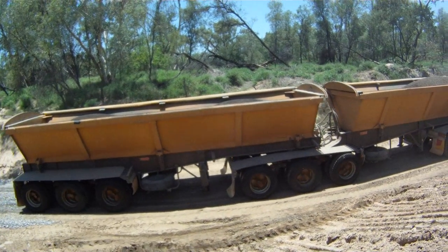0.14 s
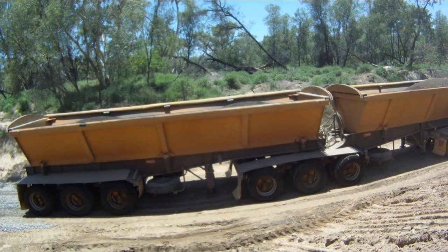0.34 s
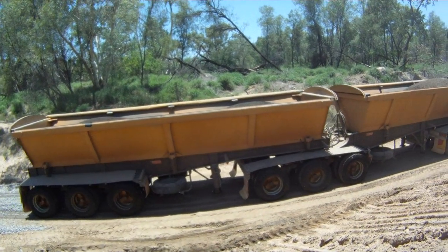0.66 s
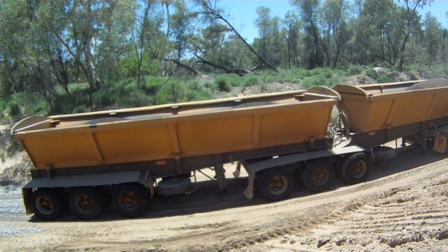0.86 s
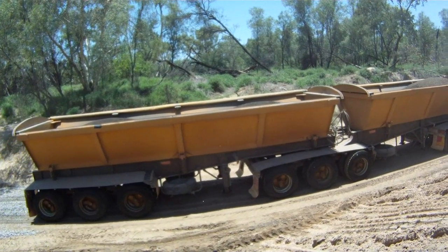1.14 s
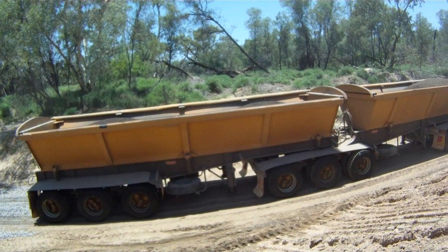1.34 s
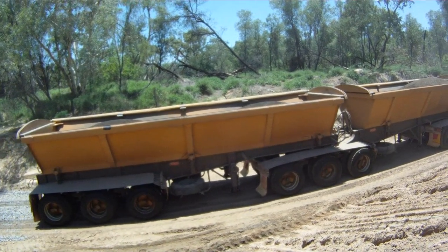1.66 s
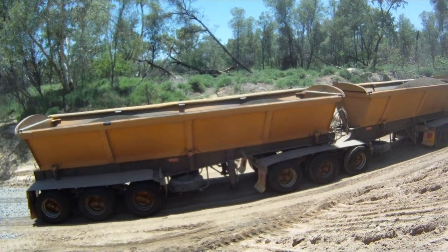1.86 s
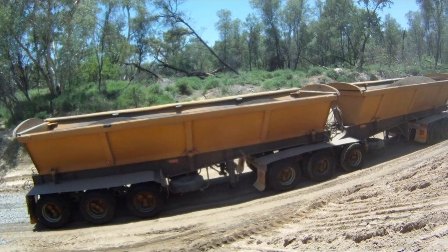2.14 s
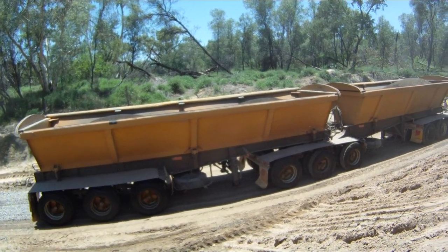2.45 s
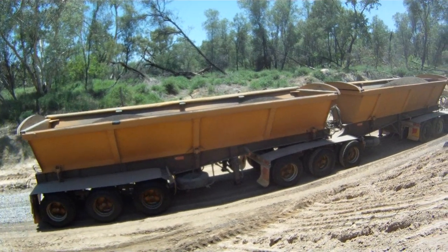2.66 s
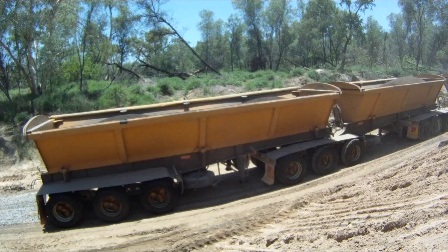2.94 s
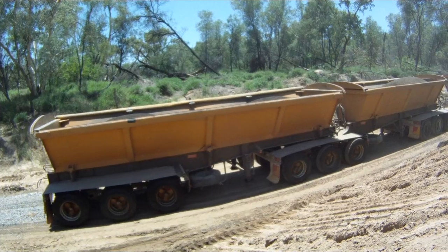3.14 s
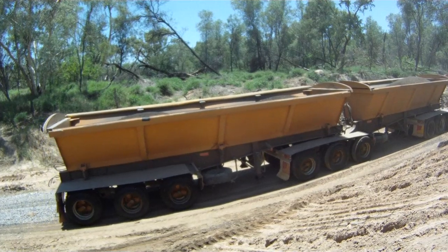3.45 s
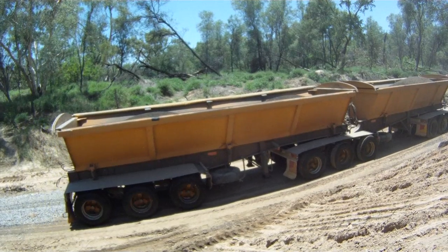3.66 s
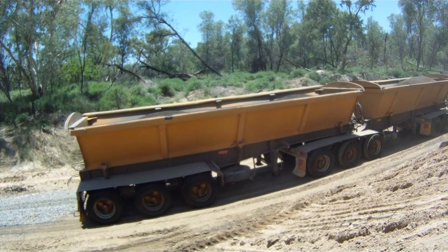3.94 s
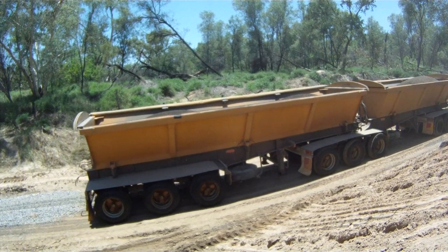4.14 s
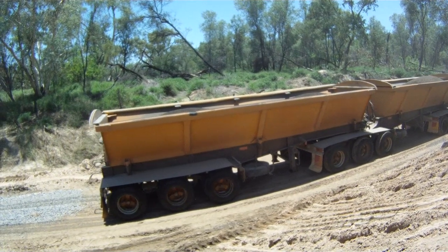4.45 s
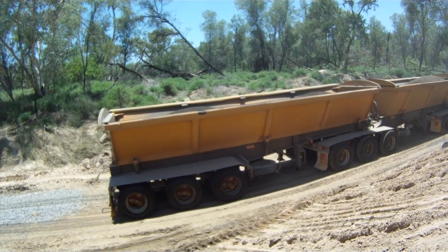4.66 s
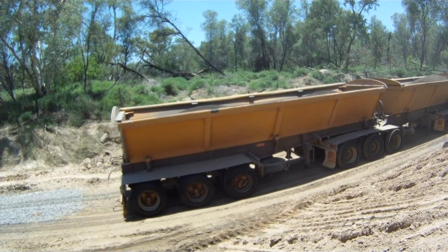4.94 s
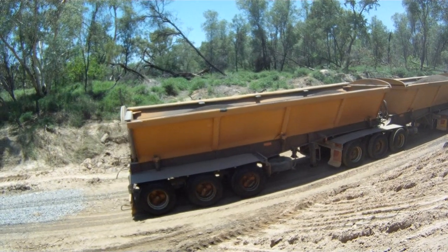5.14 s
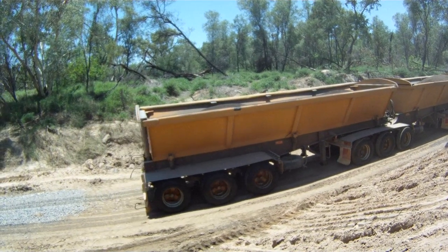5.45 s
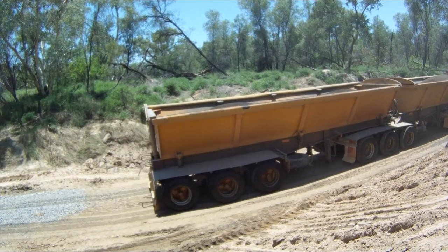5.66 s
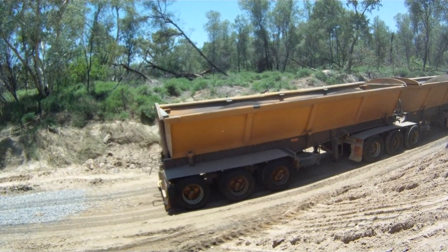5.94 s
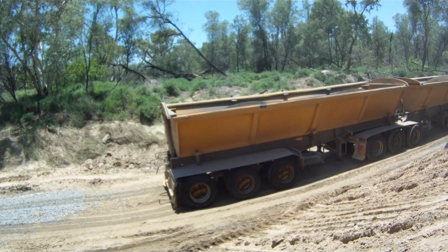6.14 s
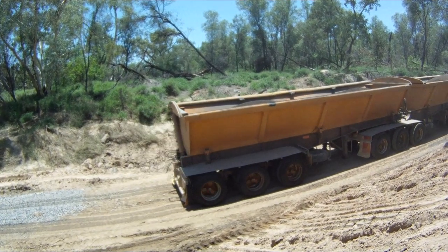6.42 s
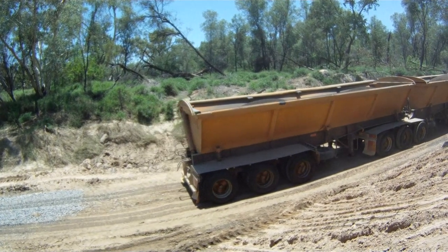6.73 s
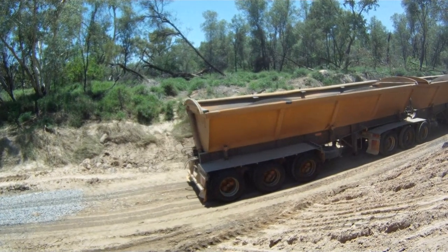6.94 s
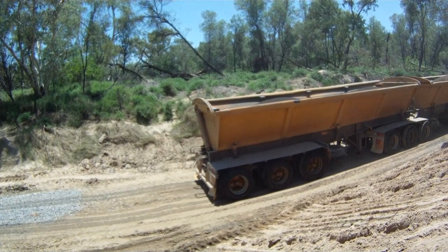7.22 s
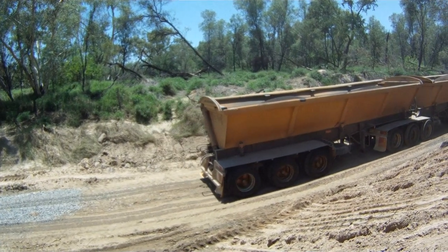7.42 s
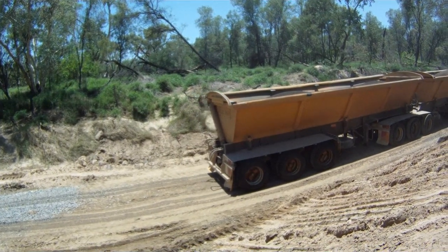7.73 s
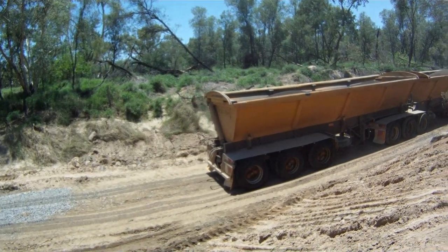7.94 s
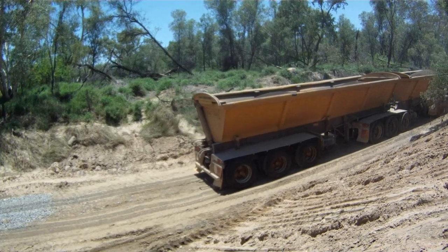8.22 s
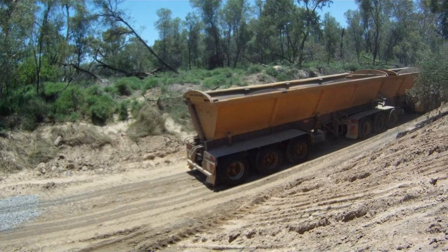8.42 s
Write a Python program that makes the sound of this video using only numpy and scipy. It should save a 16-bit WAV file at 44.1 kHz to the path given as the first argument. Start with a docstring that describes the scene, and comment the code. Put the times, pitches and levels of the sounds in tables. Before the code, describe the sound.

Deep throbbing diesel drone with crunching gravel and sharp metallic knocks as a heavy truck slowly draws away, its main tone dropping out late.

```python
"""On a dirt track, a long road train crawls uphill and slowly draws away.
Two six-cylinder diesels drone as stacks of sine tones at slightly different speeds; the louder one eases off
at the end. Shaped noise makes the rumble, exhaust and crunching tyres; a gear whine is one gliding tone.
Stones and couplings knock the steel trailers: short noise scrapes ring in damped resonances.
Slow sampling holds each value for a moment, which mirrors the sound into the treble."""
import sys
import numpy as np
from scipy.fft import rfft, irfft, next_fast_len
from scipy.io import wavfile
from scipy.ndimage import map_coordinates

SR = 44100
rng = np.random.default_rng(int(sys.argv[2]) if len(sys.argv) > 2 else 0)


def to_wav(sig):
    """Store sig (one row per channel, or 1-D mono) as 16-bit WAV at the path in sys.argv[1].

    Samples outside -1..1 are clipped; the rate is SR.
    """
    pcm = np.clip(np.atleast_2d(sig), -1, 1) * 32767
    pcm = np.round(pcm).astype(np.int16)
    wavfile.write(sys.argv[1], SR, pcm.T)  # frames by channels


N = 378378  # length in samples
TIME_S = np.arange(N) / SR


def amp(db):
    """Turn decibels into a gain."""
    return 10 ** (np.asarray(db) / 20)


def unit(x):
    """Scale a sound to an rms of 1."""
    return x / np.sqrt(np.mean(x ** 2) + 1e-20)


def curves(rows):
    """Join the table points by straight lines: one curve for each column after the time."""
    seconds, *columns = np.transpose(rows)
    return [np.interp(TIME_S, seconds, column) for column in columns]


def wobble(rate):
    """Draw a smooth random curve through `rate` random points a second."""
    points = rng.standard_normal(int(N * rate / SR) + 4)
    return map_coordinates(points, [np.arange(N) * rate / SR])


def filtered(x, response):
    """Multiply the spectrum of a sound by a response, given as a function of Hz."""
    size = next_fast_len(len(x) + 8192)  # spare room keeps the end from wrapping onto the start
    spectrum = rfft(x, size) * response(np.fft.rfftfreq(size, 1 / SR))
    return irfft(spectrum, size)[:len(x)]


def coloured(x, spectrum):
    """Shape a sound by (Hz, dB) points joined on a log frequency axis, then scale it to rms 1."""
    point_hz, point_db = np.transpose(spectrum)

    def response(hz):
        return amp(np.interp(np.log(hz + 1), np.log(point_hz + 1), point_db))
    return unit(filtered(x, response))


def noise():
    """White noise for the whole scene."""
    return rng.standard_normal(N)


def tones(cycles, orders, sway, flutter_db):
    """Add sines on whole multiples of an engine's cycle; moving air sways each one's phase and level."""
    total = np.zeros(N)
    for multiple, db in orders:
        gain = np.sqrt(2) * amp(db + flutter_db * wobble(6))  # root two gives the sine an rms of 1
        phase = 2 * np.pi * (multiple * cycles + rng.random())
        total += gain * np.sin(phase + sway * multiple * wobble(5))
    return total


EASE_S, FADE_S = 7.35, 0.79  # when the louder engine eases off; how long the layers then take to sink
# How loud each layer is over time.
# Each entry: level at the start in dB, loss as the train draws away in dB per second,
# drop after easing off in dB, unsteadiness in dB.
LAYER_LEVELS = {"octave": (-39, .5, 38, 0.8), "tones": (-31.5, 0.3, 25, 0.8),
                "rumble": (-39.5, 0.32, 3.5, .7), "pipe": (-33, .5, 13.5, 0.96),
                "rush": (-45.5, 0.36, 6.5, 0.76), "dirt": (-49.5, .35, 2.5, 0.5),
                "gravel": (-62.5, .3, 2.5, 1)}


def level_db(layer):
    """A layer recedes steadily, wavers, and sinks when the louder engine eases off."""
    start_db, recede_db, drop_db, waver_db = LAYER_LEVELS[layer]
    eased = np.clip((TIME_S - EASE_S) / FADE_S, 0, 1) ** 2.8  # slow at first, then faster
    return start_db - recede_db * TIME_S - drop_db * eased + waver_db * wobble(4)


CYLINDERS = 6  # in each engine
FIRING_HZ = 83.82  # the louder engine under steady load
SAG_HZ_PER_S, IDLE_HZ = 8.7, 79  # on easing off, the firing rate sags at this speed to this floor


def loud_cycles():
    """Count the louder engine's cycles; each of its cylinders fires once a cycle."""
    eased_s = np.maximum(TIME_S - EASE_S, 0)
    firing_hz = np.maximum(FIRING_HZ - SAG_HZ_PER_S * eased_s, IDLE_HZ)
    return np.cumsum(firing_hz) / SR / CYLINDERS


def firing_puff(cycles):
    """A wave that peaks once per firing, to make noise pulse with the louder engine."""
    return np.cos(2 * np.pi * cycles * CYLINDERS)


# The balance of low and high in the deep rumble.
# Each row: frequency in Hz, relative strength in dB per Hz.
RUMBLE_SPECTRUM = [(8.8, -42), (15, -14), (32, -5.5), (70, 4.5), (92, -3), (110, 2), (140, -17),
                   (240, -120)]


def rumble():
    """Deep turbulent engine noise: steady random noise limited to the bass."""
    return amp(level_db("rumble")) * coloured(noise(), RUMBLE_SPECTRUM)


# The exhaust pipe noise, in two humps.
# Each row: frequency in Hz, relative strength in dB per Hz.
PIPE_SPECTRUM = [(60, -54), (90, -2), (112, -5.5), (140, -1.5), (185, -1.5), (208, -6.5), (240, 2),
                 (295, -1.5), (318, -9.5), (370, -11.5), (395, -42), (500, -67)]


def pipe(puff):
    """Turbulent gas in the exhaust pipe: noise that pulses a little with each firing."""
    return amp(level_db("pipe")) * coloured(noise() * (1 + 0.065 * puff), PIPE_SPECTRUM)


# The balance of low and high in the mid-range rush.
# Each row: frequency in Hz, relative strength in dB per Hz.
RUSH_SPECTRUM = [(230, -38), (390, -6), (404, -4), (421, -8), (507, -2), (662, -8), (1130, -14),
                 (1300, -14), (1690, -19), (2860, -120)]


def rush(puff, dull_rise_db):
    """Mid-range turbulent noise: it pulses faintly with the firing and rises with the gravel slides."""
    return amp(level_db("rush") + dull_rise_db) * coloured(noise() * (1 + 0.017 * puff), RUSH_SPECTRUM)


SLIDE_EDGE_S = 0.059  # softness of the start and end of a slide
# Loose gravel sliding under the tyres.
# Each row: start in seconds, length in seconds, rise of the hiss in dB, rise of the duller rush in dB.
GRAVEL_SLIDES = [(0.55, 0.18, 1, 1), (0.9, 0.3, 2.5, 2), (1.52, 0.13, 4, 0), (1.946, 0.37, 2.5, 0.7),
                 (2.68, 0.22, 5.5, 2.5), (3.9, 0.6, 3, 1), (5.147, 0.47, 6, 1.2)]


def gravel_slides():
    """Each slide lifts the hiss and the duller rush with soft edges; returns both rises in dB."""
    rises_db = np.zeros((2, N))
    for start, length, *rise_db in GRAVEL_SLIDES:
        begin = np.tanh((TIME_S - start) / SLIDE_EDGE_S)
        end = np.tanh((TIME_S - start - length) / SLIDE_EDGE_S)
        rises_db += np.outer(rise_db, (begin - end) / 2)
    return rises_db


SLIDE_IN_DIRT = 0.45  # share of the hiss rise heard in the grinding dirt
# The grinding dirt. Each row: frequency in Hz, relative strength in dB per Hz.
DIRT_SPECTRUM = [(650, -19), (1100, -18), (1380, 0), (1600, -3), (2130, -0.5), (2430, -5.5), (3200, -4.5),
                 (3600, -17.5), (4680, -36), (7920, -120)]
# The brighter gravel hiss. Each row: frequency in Hz, relative strength in dB per Hz.
GRAVEL_SPECTRUM = [(2000, -27), (3300, -15), (3570, -4.5), (3970, -1), (4460, -8), (5060, -5), (5440, -8.5),
                   (5950, -9), (8000, -43)]


def tyres(hiss_rise_db):
    """Tyres grind dirt and gravel: uneven noise and random clicks of cracking stones, in two colours."""
    cracks = (rng.random(N) < 300 / SR) * noise() * 3.9  # about 300 a second
    bed = noise() * amp(0.19 * wobble(9) + 0.58 * wobble(30)) + cracks
    dirt = amp(level_db("dirt") + SLIDE_IN_DIRT * hiss_rise_db) * coloured(bed, DIRT_SPECTRUM)
    gravel = amp(level_db("gravel") + hiss_rise_db) * coloured(bed, GRAVEL_SPECTRUM)
    return dirt + gravel


SPLIT_HZ = 3000  # border between the low and high ringing tones of the steel
LOWEST_BRIGHT_HZ = 3250  # where dull knocks touch the high ones
FAINT_COUNT, FAINT_DB, FAINT_SPREAD_DB = 14, -54.5, 4  # extra small knocks: number, lowest level, spread
# The ringing tones (modes) of the trailer steel.
# Each row: frequency in Hz, width in Hz, strength in dB.
STEEL_MODES = [(1727, 120, -0.5), (2175, 600, -2), (2560, 150, 4.5), (3276, 230, 6.5), (3830, 570, 4),
               (4410, 180, -4), (4970, 340, 6), (5320, 330, 5)]
# Stones and couplings knocking the trailers.
# Each row: start in seconds, peak level of the high modes in dB, peak level of the low modes in dB,
# pitch in Hz, time for the scrape to fade by 60 dB in seconds.
KNOCKS = [(0.6397, -45, -45, 2580, .095), (0.681, -42, -41.5, 2749, .095), (0.697, -42, -46, 3920, 0.084),
          (0.9045, -42, -42.5, 1810, 0.087), (1.0124, -44, -38, 2370, 0.098),
          (1.109, -41, -38.5, 2190, 0.09), (1.5543, -42, -51, 3270, .044), (1.59, -43, -41, 1840, 0.12),
          (1.622, -41.5, -44, 3270, .031), (1.7892, -42, -50.5, 3270, 0.046), (2.201, -43, -48, 3510, .095),
          (2.24, -44, -41, 4090, 0.077), (2.605, -40, -37, 2840, 0.079), (2.611, -35, -33, 2100, .095),
          (2.626, -36.5, -35, 3400, 0.13), (2.642, -46, -38, 1683, .095), (2.7237, -44, -49, 3880, .095),
          (3.7445, -42.5, -46, 3830, 0.059), (4.0979, -36.5, -51, 3800, 0.079),
          (4.123, -40, -54, 3500, .06), (4.134, -42, -47, 3860, .06), (4.1994, -40, -46, 3840, .095),
          (4.2384, -39, -35.5, 3230, .066), (4.257, -51, -40, 1630, 0.057), (4.3374, -55, -36.5, 2184, .05),
          (4.3686, -50, -37, 2190, .05), (4.427, -42, -41, 1696, .042), (4.5147, -43, -43, 3730, 0.092),
          (4.561, -45, -51.5, 3810, .06), (4.611, -42, -56, 3370, .081), (5.1935, -52, -44, 2600, .095),
          (5.3737, -37, -35, 1850, .15), (6.4037, -46.5, -44, 3900, 0.1), (6.7105, -43.5, -54, 3460, 0.032),
          (7.101, -44, -42.5, 2590, .06), (7.3524, -60, -42, 2213, .08), (8.462, -41, -40.5, 2560, .12),
          (8.524, -47.5, -45.5, 2385, 0.058)]


def faint_knocks():
    """Small knocks scattered at random, in the same columns as the table of knocks."""
    return [(a * N / SR, FAINT_DB + FAINT_SPREAD_DB * b, FAINT_DB + FAINT_SPREAD_DB * c, 1700 + 2300 * d, .06)
            for a, b, c, d in rng.random((FAINT_COUNT, 4))]


def rattles():
    """Each knock is a short scrape of noise that makes the damped steel ring, low and high modes apart."""
    out = np.zeros(N + SR)
    t = np.arange(SR // 8) / SR
    mode_hz, width_hz, mode_db = np.transpose(STEEL_MODES)[:, :, None]
    high = mode_hz > SPLIT_HZ
    for start, high_db, low_db, pitch_hz, scrape_s in KNOCKS + faint_knocks():
        fade = amp(-60 * t / np.clip(scrape_s, .015, .3))
        push = rng.standard_normal(len(t)) * fade * (1 - np.exp(-t / 0.00062))
        push[0] = 9  # the first contact is a sharp blow
        # modes near the knock's pitch ring most; a bright knock also rings an octave down
        low_centre_hz = pitch_hz / 2 if pitch_hz > SPLIT_HZ else pitch_hz
        centre_hz = np.where(high, max(pitch_hz, LOWEST_BRIGHT_HZ), low_centre_hz)
        near_db = -16 * np.abs(np.log2(mode_hz / centre_hz))
        gain = amp(mode_db + near_db + rng.normal(0, 0.41, mode_hz.shape))

        def ringing(f):
            damping = 1j * f * width_hz
            return gain * (damping / (mode_hz ** 2 - f * f + damping)) ** 2  # squared for steep sides

        for peak_db, part in ((high_db, high), (low_db, ~high)):
            knock = filtered(push, lambda f: np.sum(part * ringing(f), axis=0))
            out[round(start * SR):][:len(t)] += amp(peak_db) * knock / np.abs(knock).max()
    return out[:N]


# The gear whine. Each row: time in seconds, pitch in Hz, level in dB.
WHINE_CURVE = [(0, 377.4, -46.5), (.6, 369.3, -52.5), (1.15, 366.4, -48.5), (1.7, 372.5, -53),
               (2.9, 369.5, -46.5), (3.4, 374.8, -50.5), (5.4, 374.5, -47), (6.5, 376, -54),
               (7.4, 378.3, -48.5), (7.75, 374, -53.5), (8, 368, -77), (8.58, 367.4, -79)]


def gear_whine():
    """A single sine glides in pitch, with unsteady level and phase."""
    hz, db = curves(WHINE_CURVE)
    phase = 2 * np.pi * np.cumsum(hz) / SR
    return np.sqrt(2) * amp(db + 2.1 * wobble(9)) * np.sin(phase + 0.37 * wobble(4.1))


# The softer engine. Each row: time in seconds, firing rate in Hz, level in dB.
SOFT_CURVE = [(0, 88.5, -43), (1.5, 88.8, -45.5), (4, 88.56, -46), (6, 88.7, -45), (7.6, 88.47, -50),
              (8.1, 87.96, -44), (8.58, 87.1, -43.5)]
# Its exhaust tones. Each row: multiple of the cycle rate, strength in dB against the level above.
SOFT_TONES = [(3, -11), (6, -.5), (9, -6), (10, -10), (12, -1), (14, -10), (15, -13)]


def soft_engine():
    """The softer diesel: exhaust tones on multiples of its own, slightly different cycle rate."""
    firing_hz, db = curves(SOFT_CURVE)
    cycles = np.cumsum(firing_hz) / SR / CYLINDERS
    return amp(db) * tones(cycles, SOFT_TONES, sway=0.048, flutter_db=1.5)


NEIGHBOUR, NEIGHBOUR_DB = 1.017, -2  # tone just above twice the firing rate: pitch ratio, relative level
# The louder engine's firing tone, swelling as the trailers screen and free it.
# Each row: time in seconds, level in dB.
LOUD_FIRING = [(0, -32.5), (1.1, -33.5), (1.3, -44), (1.6, -31), (1.88, -39), (2.0, -31.5), (2.1, -37),
               (2.4, -30), (2.7, -33), (3.5, -33.5), (3.75, -35.5), (4.3, -35), (4.47, -39.5), (4.7, -31.5),
               (5.15, -34.5), (5.3, -30.5), (6.1, -29.5), (6.25, -37), (6.4, -30.5), (7.1, -31.5),
               (7.22, -34.5), (7.45, -32), (7.85, -51), (8.58, -62)]
# Its other exhaust tones, from unequal cylinders.
# Each row: multiple of the cycle rate, strength in dB against their common level.
LOUD_TONES = [(2, -23.5), (3, -20), (4, -18), (10, -12.5), (14, -14), (18, -17.5), (20, -20), (36, -31)]


def loud_engine(cycles):
    """The louder diesel: a firing tone, its octave with a beating neighbour, and other exhaust tones."""
    firing_db, = curves(LOUD_FIRING)
    firing_order, octave_order = [(CYLINDERS, 0)], [(2 * CYLINDERS, 0)]
    firing = amp(firing_db) * tones(cycles, firing_order, sway=0.013, flutter_db=1.6)
    octave = amp(level_db("octave")) * tones(cycles, octave_order, sway=0.052, flutter_db=2.0)
    neighbour_gain = amp(level_db("octave") + NEIGHBOUR_DB)
    neighbour = neighbour_gain * tones(cycles * NEIGHBOUR, octave_order, sway=0.061, flutter_db=2.5)
    others = amp(level_db("tones")) * tones(cycles, LOUD_TONES, sway=0.033, flutter_db=2.5)
    return firing + octave + neighbour + others


def scene():
    """Add all the sources together at one microphone."""
    cycles = loud_cycles()
    puff = firing_puff(cycles)
    hiss_rise_db, dull_rise_db = gravel_slides()
    roar = rumble() + pipe(puff) + rush(puff, dull_rise_db) + tyres(hiss_rise_db)
    drone = gear_whine() + soft_engine() + loud_engine(cycles)
    return (roar + rattles() + drone)[None]


HOLD_HZ, STEPS = 12000, 4  # slow sampling rate; steps each value is held for
TOP_HZ = 15300  # nothing passes above this


def record(dry):
    """Slow sampling with each value held for four steps: a mirror image round the sampling rate."""
    def before_sampler(hz):
        return (hz < HOLD_HZ / 2) / np.sqrt(1 + (hz / 5500) ** 32)

    def hold(hz):
        held = np.sinc(hz / HOLD_HZ) / np.sinc(hz / (HOLD_HZ * STEPS))  # holding dulls the treble
        return held * (hz < TOP_HZ)

    slow = filtered(dry[0], before_sampler)
    mirrored = slow * (1 + 2 * np.cos(2 * np.pi * HOLD_HZ * TIME_S))
    return filtered(mirrored, hold)[None]


dry = scene()
out = record(dry)
to_wav(out)
```